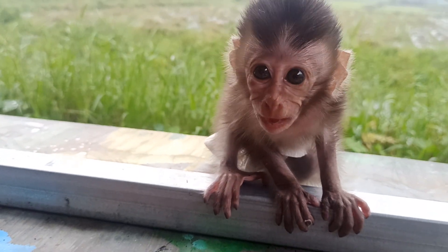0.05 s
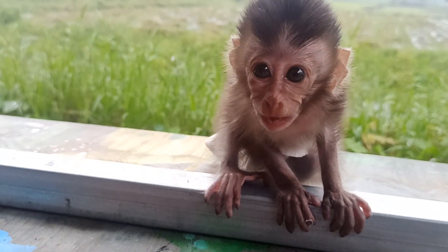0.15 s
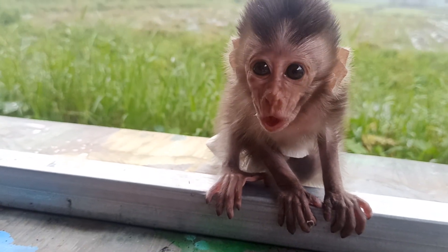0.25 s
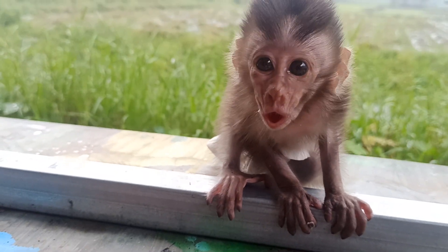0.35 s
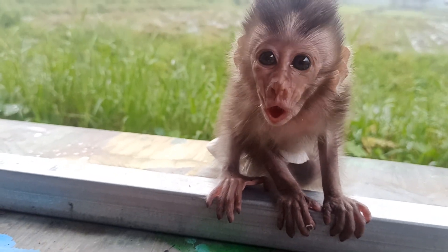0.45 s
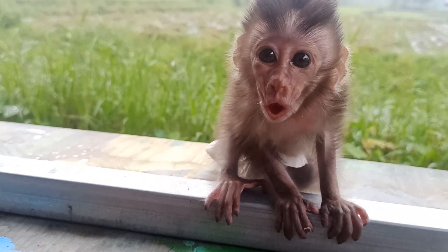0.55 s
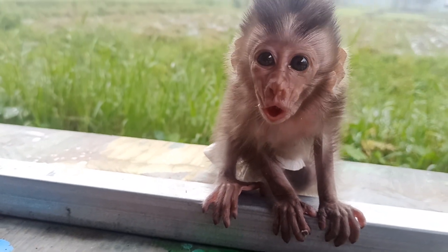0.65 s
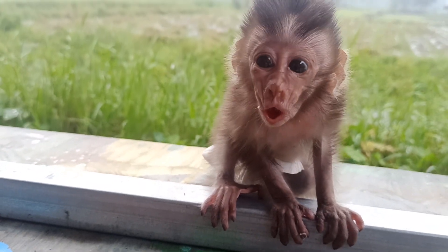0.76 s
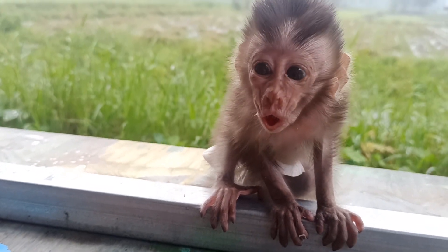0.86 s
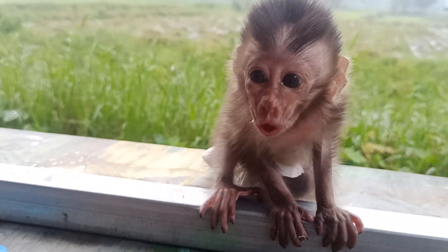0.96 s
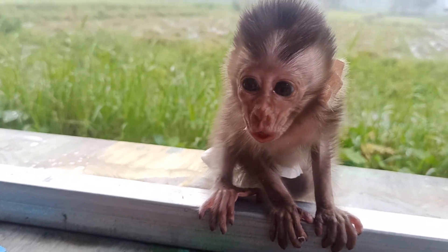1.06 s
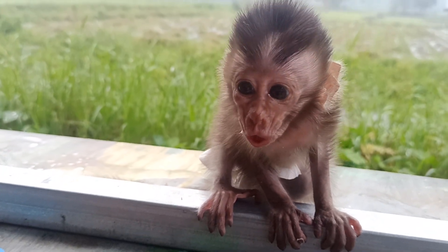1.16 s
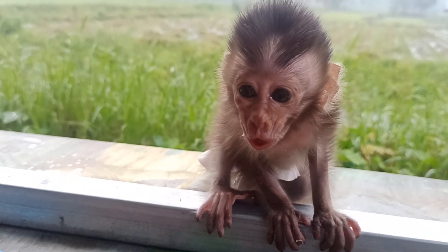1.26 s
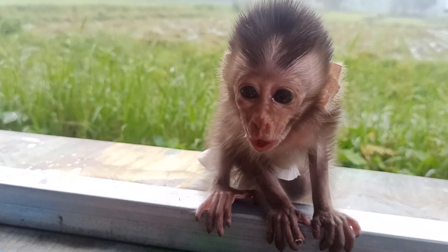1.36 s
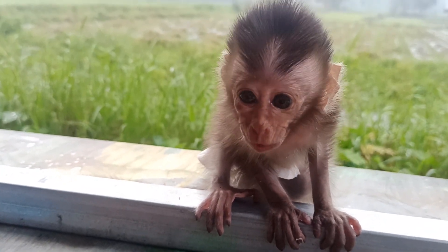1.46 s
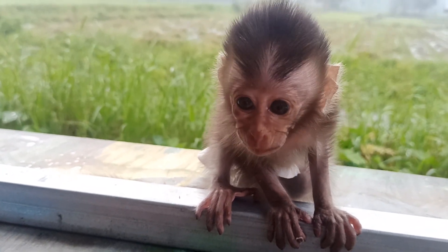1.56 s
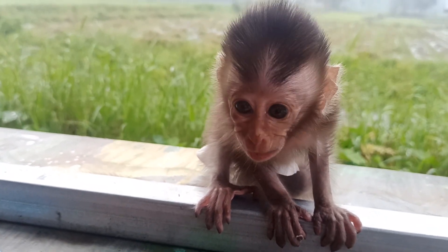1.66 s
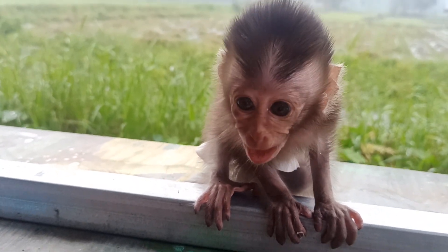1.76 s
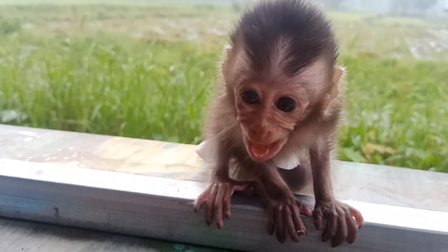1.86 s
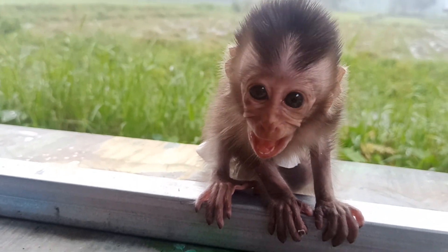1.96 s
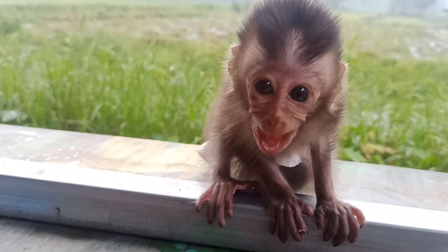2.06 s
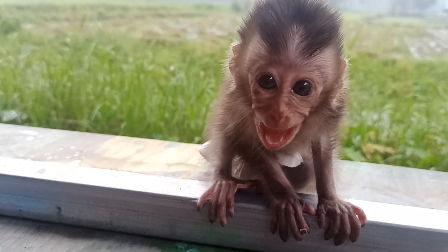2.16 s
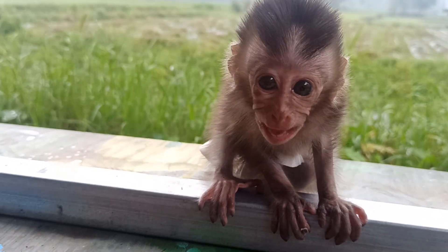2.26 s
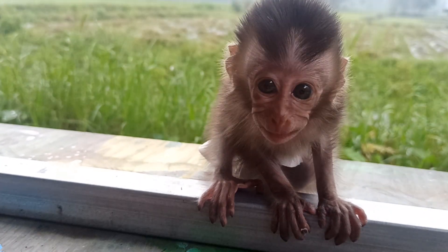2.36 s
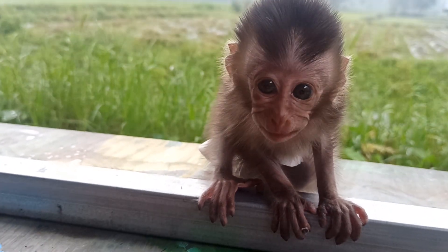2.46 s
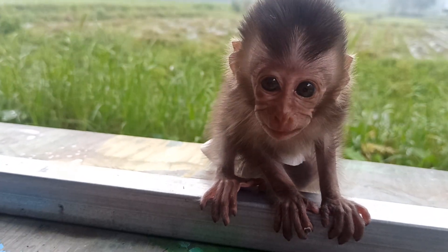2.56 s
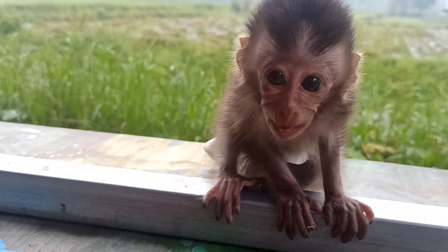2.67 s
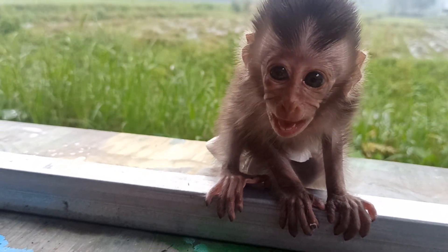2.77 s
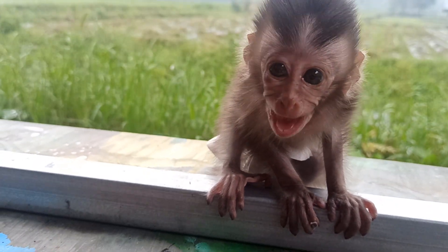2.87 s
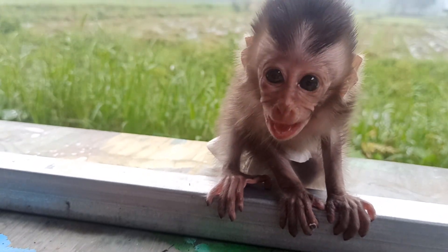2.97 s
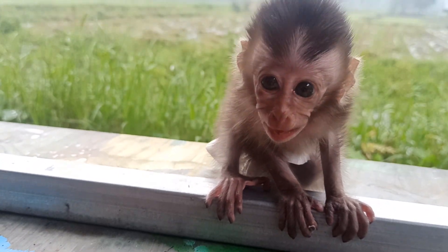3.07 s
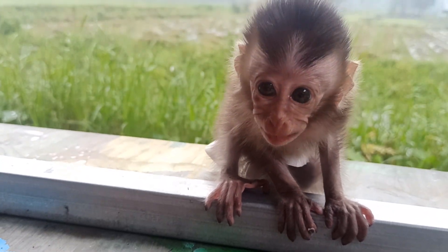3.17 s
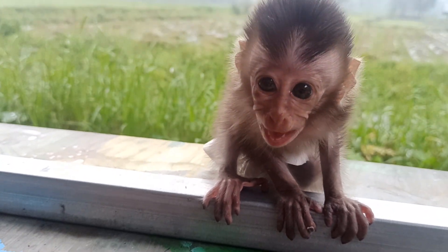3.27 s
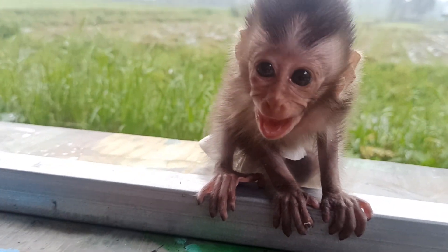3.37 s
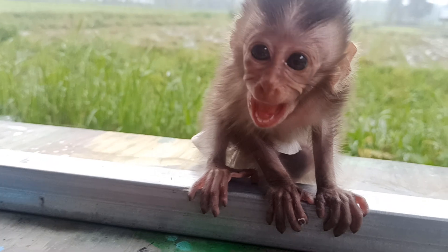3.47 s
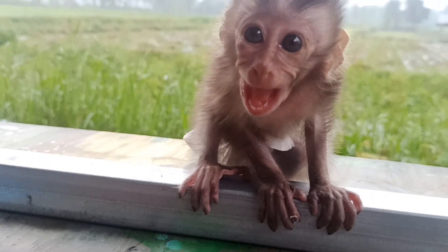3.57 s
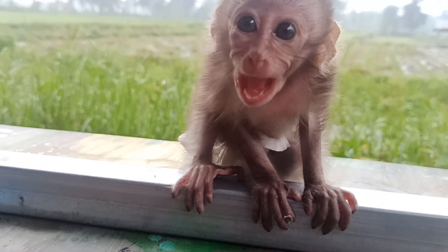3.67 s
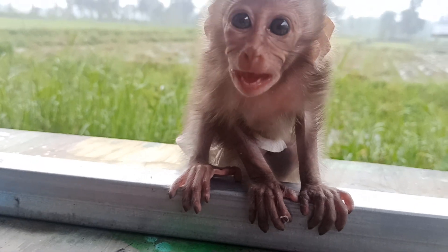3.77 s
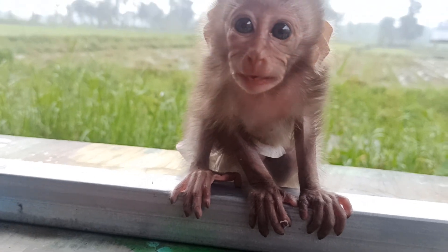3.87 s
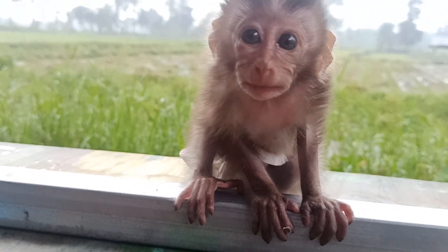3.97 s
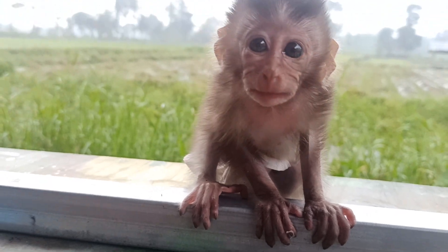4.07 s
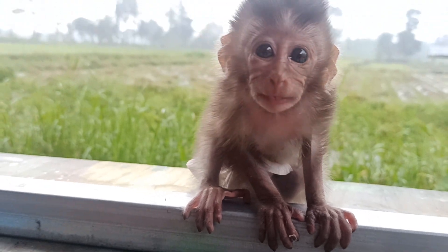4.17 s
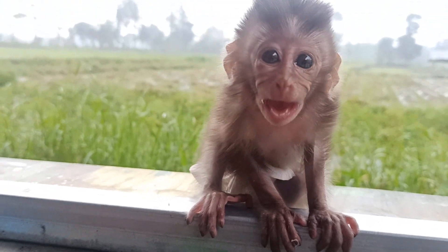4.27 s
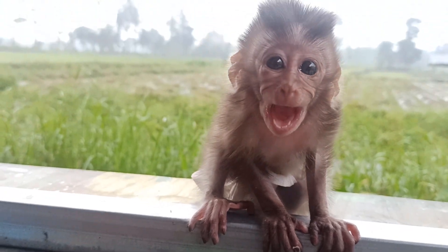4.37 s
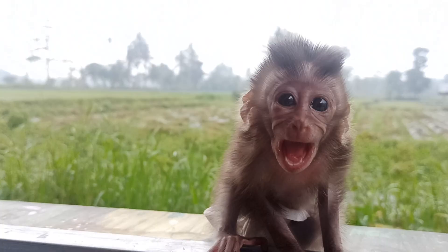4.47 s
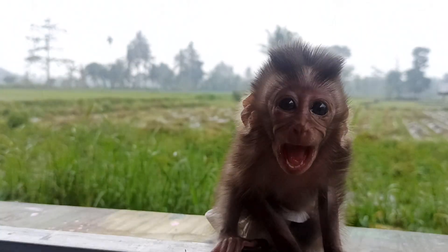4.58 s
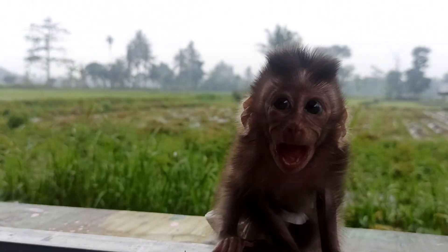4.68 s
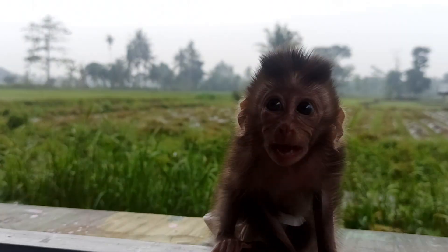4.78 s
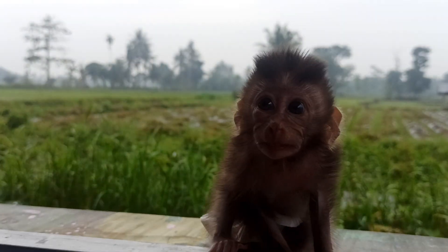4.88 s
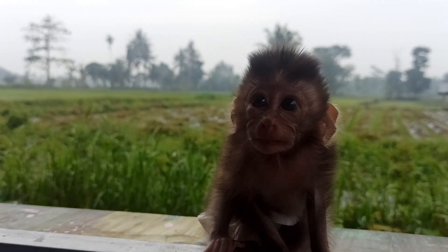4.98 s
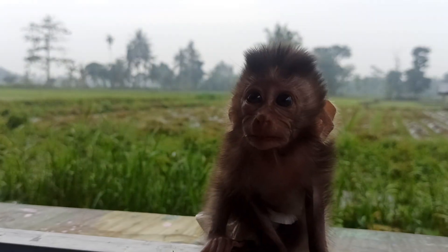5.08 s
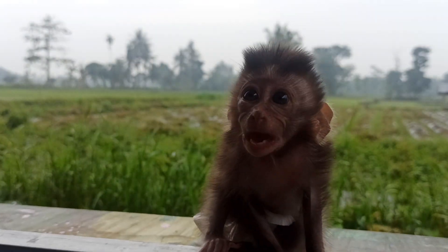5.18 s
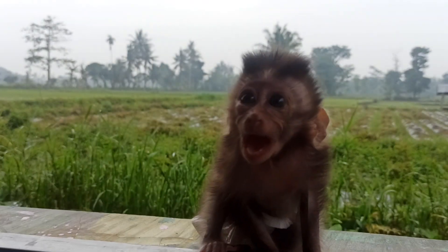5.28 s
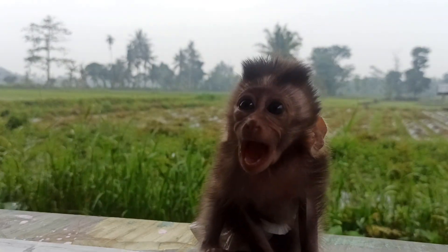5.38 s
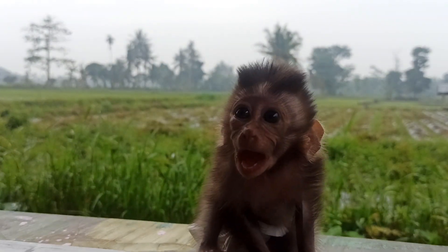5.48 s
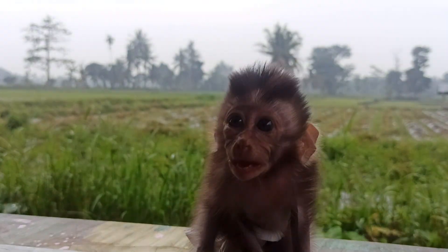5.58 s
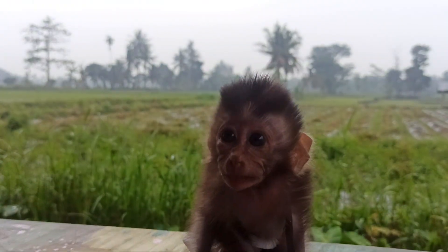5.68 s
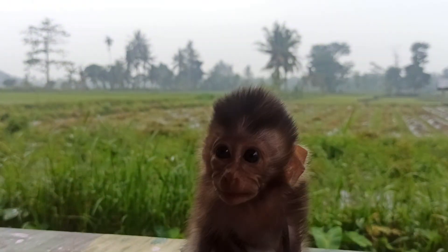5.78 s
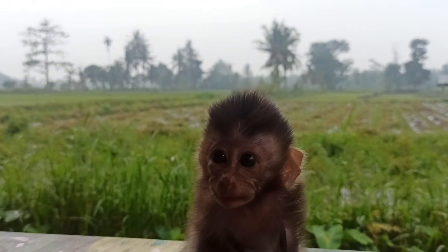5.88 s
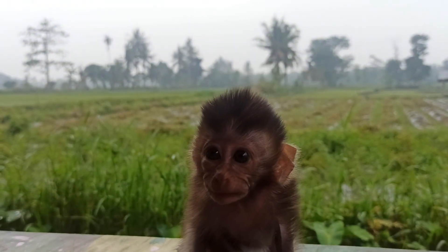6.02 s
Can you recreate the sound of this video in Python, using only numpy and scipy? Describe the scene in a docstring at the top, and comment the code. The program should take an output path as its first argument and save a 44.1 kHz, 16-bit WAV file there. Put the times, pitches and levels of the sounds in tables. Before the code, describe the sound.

Outdoors beside a grassy field, a baby monkey very close to a small stereo recorder coos softly twice, then breaks into thin shrill squeals that shoot upward, with tiny breathy gasps. Calls come in bursts with pauses. A short diffuse echo follows, stronger on squeals. Behind, low soft rumble, faint insect hiss and regular cricket chirps; fingers bump the recorder midway.

```python
"""A baby monkey coos, squeals and gasps close by: gliding overtones shaped by the lips, and puffs of coloured noise.
It sits on a low wall beside a wet field; two recorder ports hear it, and nearby walls answer with decaying noise echoes.
Insects drone (filtered noise), a cricket chirps (falling sines), far traffic swells (low noise),
a bird whistles once (a rising sine) and fingers tap the case (short pulses)."""
import sys
import numpy as np
from scipy import signal
from scipy.fft import rfft, irfft, next_fast_len
from scipy.io import wavfile
from scipy.ndimage import uniform_filter1d, minimum_filter1d, map_coordinates

SR = 44100
rng = np.random.default_rng(int(sys.argv[2]) if len(sys.argv) > 2 else 0)


def gain_from_decibels(decibels):
    """Convert decibel values to linear amplitude factors."""
    exponent = np.asarray(decibels, float) / 20
    return 10 ** exponent


def wav_out(sig):
    """Save sig, one row per channel (or a flat mono array), as 16-bit PCM at SR to the path in sys.argv[1]."""
    wavfile.write(sys.argv[1], SR, np.round(np.clip(np.atleast_2d(sig).T, -1, 1) * 32767).astype(np.int16))


N = 266805


def unit(x):
    """Scaled to rms 1."""
    return x / np.sqrt(np.mean(x ** 2) + 1e-20)


def along(points, hz, order=1):
    """One column of a (Hz, values) table, read on a log frequency axis."""
    table = np.transpose(points)
    return np.interp(np.log(hz + 1), np.log(table[0] + 1), table[order])


def wobble(rate, size=N):
    """A smooth random curve, rate knots a second."""
    knots = rng.standard_normal(int(size * rate / SR) + 4)
    return map_coordinates(knots, [np.arange(size) * rate / SR])


def filtered(x, response):
    """x times a complex response of frequency."""
    size = next_fast_len(x.shape[-1] + 8192)
    spectrum = rfft(x, size) * response(np.fft.rfftfreq(size, 1 / SR))
    return irfft(spectrum, size)[..., :x.shape[-1]]


# Left-right likeness of background noise. Each row: frequency in Hz, likeness from 0 to 1.
ALIKE = [(60, 0.93), (130, 0.97), (290, 0.68), (640, 0.24), (1400, 0.012)]
# Left-right balance of background noise. Each row: frequency in Hz, left minus right in dB.
LEAN = [(60, 1.5), (240, -1), (950, -0.5), (3770, -6.5), (15000, 20)]


def rush(spectrum, patchy_db):
    """Stereo noise of rms 1: likeness set by mixing mid and side, patches of random gain in time and frequency."""
    z = signal.stft(rng.standard_normal((2, N + 512)), nperseg=512)[2]
    patches = uniform_filter1d(uniform_filter1d(rng.standard_normal(z.shape[1:]), 6, 0), 14, 1)
    pair = signal.istft(z * gain_from_decibels(patchy_db * unit(patches)), nperseg=512)[1][:, :N]

    def mid_side(hz):
        angle = np.arccos(np.clip(along(ALIKE, hz), -1, 1)) / 2
        return gain_from_decibels(along(spectrum, hz)) * [np.cos(angle), np.sin(angle)]

    mid, side = filtered(pair, mid_side)
    both = np.array([mid + side, mid - side])
    return unit(filtered(both, lambda hz: gain_from_decibels(np.outer([.5, -.5], along(LEAN, hz)))))


# Rumble and grass. Each row: frequency in Hz, relative density in dB per Hz.
FIELD_SPECTRUM = [(18, -72.5), (30, -41.5), (60, -3.5), (160, 0), (226, -11), (281, -11.5), (552, -17.5),
                  (781, -15.5), (1400, -27.5), (1600, -27), (3280, -22.5), (4640, -16.5), (5400, -45.5),
                  (7020, -73.5), (11900, -120)]


def field():
    """Rumble and grass as noise whose level drifts slowly."""
    level_db = -49.5 + 0.84 * wobble(4.8)
    return gain_from_decibels(level_db) * rush(FIELD_SPECTRUM, patchy_db=0.5)


# Far insects. Each row: frequency in Hz, relative density in dB per Hz.
SWARM = [(3180, -59.5), (5400, -25), (6680, 5.5), (7070, -7), (8510, -6.5), (8780, -20.5), (9810, -71),
         (11100, -71), (11300, -30), (12100, -32.5), (15500, -31.5)]


def insects():
    """A far chorus of hiss, with one narrow buzzing drone that throbs about twelve times a second."""
    throb_phase = 2 * np.pi * 12 * np.arange(N) / SR + 2.8 * wobble(2.5)
    throb = gain_from_decibels(4.1 * np.sin(throb_phase) + 0.5 * wobble(1.1))
    drone = filtered(rng.standard_normal((2, N)), lambda hz: 1 / (1 + ((hz - 6560) / 90) ** 2))
    hiss = gain_from_decibels(-47.0) * rush(SWARM, patchy_db=4.5)
    return hiss + gain_from_decibels(-57.5) * throb * unit(drone) * gain_from_decibels([[1.5], [-1.5]])


# Air through the throat. Each row: frequency in Hz, relative density in dB per Hz.
BREATH = [(880, -71.5), (1500, -31.5), (2400, -31.5), (4120, -9.5), (5100, -30.5), (7720, -16.5),
          (10500, -83), (11800, -29.5), (15000, -31.5)]


def air():
    """Turbulent air coloured by the throat, rms 1."""
    return unit(filtered(rng.standard_normal(N), lambda hz: gain_from_decibels(along(BREATH, hz))))


# Puffs between calls and where the voice breaks. Each row: start in seconds, length in seconds, nominal level in dB.
GASPS = [(.002, 0.024, -37), (1.393, 0.0068, -49.5), (2.104, 0.028, -15.5), (2.135, .012, -24.5),
         (2.9, .02, -44.5), (3.67, .022, -33.5), (4.66, 0.034, -38.5), (5.205, 0.059, -28),
         (5.415, 0.023, -32.5)]


def gasps():
    """Short rushes of turbulent air: quick rise, slower fall, fluttering."""
    t, shape = np.arange(N) / SR, np.zeros(N)
    for start_s, length_s, db in GASPS:
        u = np.clip((t - start_s) / length_s, 0, None)
        shape += gain_from_decibels(db) * (1 - np.exp(-9 * u)) * np.exp(-u ** 3)
    return shape * gain_from_decibels(3.5 * wobble(220)) * air()


# Echo decay. Each row: frequency in Hz, time to fall 60 dB in seconds.
WALLS = [(500, 1), (2500, 0.43), (3300, 0.47), (4000, 0.66), (7500, 0.66), (13000, 0.63)]


def walls(x):
    """Diffuse echoes: a faint onset, a clump from a wall near 48 ms, then a tail dying band by band."""
    flutter_db, flutter_per_s = 3, 60
    hz, t, z = signal.stft(rng.standard_normal((2, SR * 3 // 4)), SR, nperseg=128)
    clump = .5 + 0.34 * np.exp(-((t - .045) / 0.0088) ** 2)
    decay = gain_from_decibels(-60 * t / along(WALLS, hz)[:, None])
    tail = signal.istft(z * clump * decay, SR, nperseg=128)[1]
    delayed = np.pad(tail, ((0, 0), (120, 0))) / np.linalg.norm(tail[0])
    echoes = signal.fftconvolve(x, delayed, axes=1)[:, :N]
    flutter = np.array([wobble(flutter_per_s), wobble(flutter_per_s)])
    return echoes * gain_from_decibels(flutter_db * flutter)


def cricket():
    """Regular phrases of four short falling chirps, the last one weak."""
    out, t = np.zeros(N + SR), np.arange(SR // 50) / SR
    chirp = np.sin(np.pi * t / t[-1]) ** 2 * np.sin(2 * np.pi * (5100 * t - 27000 * t ** 2))
    starts_s = .172 + .2422 * np.arange(25)
    for start_s, luck in zip(starts_s, rng.standard_normal((25, 4))):
        for k, db in enumerate([-50.5, -50.5, -50, -60]):
            out[round((start_s + .034 * k) * SR):][:len(t)] += gain_from_decibels(db + 1.5 * luck[k]) * chirp
    return out[:N] * gain_from_decibels([[-3], [3]])


# Pitch and effort, one list per call. Each row: time in seconds, pitch in Hz, effort in dB.
CRIES = [
    [(.254, 910, -42), (.265, 866, -28), (.308, 949, -27.5), (.358, 1010, -22.5), (.486, 1028, -22),
     (.51, 982, -23), (.535, 923, -29), (.543, 910, -47.5)],
    [(.705, 696, -32.5), (.723, 779, -29.5), (.748, 893.5, -24), (.791, 900, -22), (.808, 939.3, -21),
     (.864, 938.5, -20), (.884, 920, -23.5), (.897, 887, -51)],
    [(1.148, 668, -35), (1.16, 630, -30.5), (1.185, 615, -28.5), (1.206, 666, -32.5), (1.225, 804.5, -32.5),
     (1.256, 798, -31), (1.285, 748, -34), (1.316, 962, -24.5), (1.338, 999, -30), (1.365, 1291, -28),
     (1.383, 1220, -37)],
    [(1.648, 844, -35), (1.655, 780, -31.5), (1.667, 993, -25.5), (1.684, 930, -28.5), (1.692, 1060, -38.5),
     (1.698, 1092, -50)],
    [(1.742, 2284, -51), (1.749, 2410, -39), (1.753, 2647, -21.5), (1.785, 2723, -26.5),
     (1.796, 3192, -29.5), (1.821, 3805, -32), (1.832, 4563, -28), (1.846, 5501, -14), (1.858, 6815, -15.5),
     (1.868, 7560, -10), (1.877, 8540, -21), (1.9, 9160, -33.5), (1.915, 9270, -18), (1.95, 10290, -21.5),
     (1.978, 10650, -31), (2.012, 10530, -14), (2.03, 9670, -14), (2.055, 8785, -17.5), (2.066, 8420, -10),
     (2.078, 7844, -18.5), (2.094, 6420, -25.5), (2.107, 4245, -15.5), (2.113, 3450, -32),
     (2.125, 2692, -35), (2.141, 2300, -35.5), (2.15, 1900, -42), (2.168, 997, -43)],
    [(2.601, 697, -34.5), (2.609, 640, -29.5), (2.625, 612, -26.5), (2.638, 672, -35.5),
     (2.646, 760, -41.5)],
    [(2.703, 687, -33.5), (2.713, 595, -35), (2.726, 655, -29.5), (2.74, 1110, -34), (2.748, 1332, -25.5),
     (2.761, 1254, -26), (2.775, 1513, -38), (2.78, 1452, -63)],
    [(2.808, 2254, -44), (2.814, 2480, -20), (2.826, 2620, -17), (2.841, 2780, -26.5), (2.85, 2934, -39.5),
     (2.858, 3043, -45.5)],
    [(3.217, 911, -31), (3.224, 853, -37), (3.241, 831, -34.5), (3.254, 1144, -39), (3.268, 1400, -31),
     (3.279, 1681, -35.5), (3.296, 2282, -22), (3.326, 2650, -24), (3.34, 3160, -24), (3.358, 3296, -28),
     (3.369, 3440, -58)],
    [(3.402, 5270, -27.5), (3.411, 5570, -14.5), (3.418, 5926, -12.5), (3.428, 6960, -13.5),
     (3.443, 7650, -17.5), (3.465, 8700, -25.5), (3.485, 8810, -20.5), (3.515, 10270, -20)],
    [(4.179, 867, -33), (4.19, 742, -33.5), (4.206, 670, -32), (4.222, 805, -39.5), (4.24, 883, -34.5),
     (4.251, 770, -30), (4.26, 936, -26.5), (4.272, 1146, -26.5), (4.283, 1656, -24), (4.293, 1931, -17),
     (4.32, 2428, -19.5), (4.332, 3050, -29.5), (4.342, 3200, -18), (4.353, 3290, -25.5),
     (4.361, 3630, -34)],
    [(4.402, 5320, -16.5), (4.415, 5540, -23.5), (4.426, 6215, -15), (4.441, 6930, -22.5),
     (4.455, 7500, -20.5), (4.474, 7590, -22.5), (4.51, 7970, -29), (4.52, 8320, -16), (4.542, 8390, -20.5),
     (4.55, 7650, -37)],
    [(5.108, 793, -37), (5.114, 655, -34), (5.128, 697, -36), (5.143, 645.6, -26), (5.158, 638, -39.5),
     (5.172, 770, -37), (5.189, 625.6, -32), (5.204, 697, -31), (5.219, 1414, -25.5), (5.228, 1645, -25),
     (5.244, 1243, -25.5), (5.258, 1710, -25), (5.265, 2386, -23.5), (5.285, 2710, -19), (5.298, 3054, -34),
     (5.315, 3230, -39), (5.325, 3526, -27), (5.342, 3780, -51.5), (5.36, 3844, -46.5), (5.39, 3800, -61)],
    [(5.406, 2375, -36.5), (5.41, 2332, -24.5), (5.413, 2042, -30.5), (5.417, 1600, -27.5),
     (5.42, 1425, -37.5)],
]
# Posture, one row per call. Each row: overtone slope at start and at end in dB per octave,
# upper throat tilt in dB per kHz (pouted lips, 2.3 to 3.8 kHz), head turn as left minus right in dB.
POSTURE = [(-11.5, -11, 4, 1), (-11, -16.5, 4.5, -0.5), (-7.5, -11.5, 3, 1), (-13.5, -10.5, -4.5, 1.5),
           (-2, -4, -1, 0), (-13.5, -4.5, -3, 2.5), (-7, -10, 2, 5), (-5, -24, 0, 2.5),
           (-6.5, -6.5, -4.5, 0.5), (-7, -10.5, 0, -3), (-9.5, -6, -1.5, 5.5), (-3, -4, 0, 1.5),
           (-6, -7.5, -5, 2.5), (-8.5, -8, -9, -6)]
# Overtone slope by pitch: duller near 3.5 to 5 kHz, brighter above 6.7 kHz.
# Each row: pitch in Hz, added slope in dB per octave.
SLOPE_BY_PITCH = [(700, 1), (1200, 1.5), (2300, 0.5), (3500, -7), (5000, -7), (6700, 3.5), (8300, 3.5)]
# Throat and microphones. Each row: frequency in Hz, pouted lips in dB, wide mouth in dB, left minus right in dB.
MOUTH = [(600, -9, 4.5, -5.5), (1200, -8.5, -16.5, -5.5), (1658, 1, 0, -2.5), (2046, 10, -4.5, -9.5),
         (2526, -15, 4.5, -13.5), (2834, -4, 14, -4.5), (3343, 15.5, 19.5, -13.5), (4227, 22.5, 10, -16.5),
         (5670, -21, 1, -3), (6220, -4.5, 6, 20), (6900, 5, 11, -2.5), (7280, 16, 17.5, 4),
         (8750, 20.5, -10.5, 20.5), (10840, -24, 7, 6.5), (13280, -6, -5.5, -6), (15500, -4.5, -7.5, -8)]


def voice():
    """Vocal folds as ten overtones of the pitch, coloured by lips that part as it climbs; also the share sent to walls."""
    brighter_per_effort_db, usual_effort_db = 0.17, -31.5  # slope in dB per octave, per dB of effort
    brighter_in_glides_db = 2.5  # per octave, at full strain
    waver_wide_db, waver_in_glides_db, waver_per_s = 0.9, 1, 90
    tone, turn_db, leak, to_walls = np.zeros(N), np.zeros(N), np.zeros(N), np.ones(N)
    k = np.arange(1, 11)[:, None]
    for call, (first_db, last_db, upper_db, left_db) in zip(CRIES, POSTURE):
        s, *cols = np.transpose(call)
        span = np.arange(round(s[0] * SR), round(s[-1] * SR))
        size = len(span)
        pitch, effort_db = [np.interp(span / SR, s, c) for c in cols]
        pitch = uniform_filter1d(pitch, 160)
        # fast glides unsettle the folds
        strain = np.clip(abs(np.gradient(np.log(pitch))) * SR / 20, 0, 1)
        pitch = pitch * (1 + (0.0018 + 0.019 * strain) * wobble(250, size=size))

        slope_db = np.linspace(first_db, last_db, size) + along(SLOPE_BY_PITCH, pitch)
        slope_db += brighter_per_effort_db * (effort_db - usual_effort_db) + brighter_in_glides_db * strain
        wide = np.clip(np.log(pitch / 1100) / 0.17, 0, 1)
        pout_db = along(MOUTH, k * pitch) + upper_db * np.clip(k * pitch / 1000 - 2.3, 0, 1.5)
        colour_db = (1 - wide) * pout_db + wide * along(MOUTH, k * pitch, order=2)
        rolloff_db = (0.6273 + 0.067 * wide) * k ** 2
        level = gain_from_decibels(effort_db + slope_db * np.log2(k) - rolloff_db + colour_db) * (k * pitch < 16000)
        # each overtone above the first swells and sinks on its own
        waver = np.array([wobble(waver_per_s, size=size) for _ in k])
        level = level * gain_from_decibels((waver_wide_db * wide + waver_in_glides_db * strain) * waver * (k > 1))

        edge = np.minimum(span - span[0], span[-1] - span)
        fade = np.minimum(1, edge / (0.0033 * SR))
        shimmer = gain_from_decibels((0.25 + 0.63 * wide + 3 * strain) * wobble(158.3, size=size))
        overtones = level * np.sin(k * 2 * np.pi * np.cumsum(pitch) / SR)
        tone[span] = np.sqrt(2) * fade * shimmer * overtones.sum(0)
        leak[span] = fade * (.3 - 0.22 * wide + 0.3 * strain) * np.linalg.norm(level, axis=0)
        turn_db[span] = left_db
        to_walls[span] = gain_from_decibels(-6 * (2.0 - wide))  # pouted lips aim forward, so less reaches the walls
    cry = tone + gain_from_decibels(-15.5) * leak * air()  # air leaks past the folds, more when strained
    return cry * gain_from_decibels(np.outer([.5, -.5], turn_db)), to_walls


# Path difference to the two ports. Each row: frequency in Hz, left lead in radians.
LEAD = [(100, -0.5), (2000, 0.5), (3800, 2), (6300, 6.5), (9500, 10), (15500, 11.5)]


def ports(x):
    """The body of the recorder shades and delays the sound differently at each port."""
    half = np.array([[.5], [-.5]])

    def response(hz):
        shade = gain_from_decibels(half * along(MOUTH, hz, order=3))
        return shade * np.exp(1j * half * along(LEAD, hz))

    return filtered(x, response)


# Fingers on the case. Each row: time in seconds, peak in dB at the right port, knock frequency in Hz.
TAPS = [(2.06, -26.5, 304), (3.178, -22.5, 1330), (3.223, -11.5, 600), (3.25, -12, 1200), (3.252, -20, 350),
        (3.299, -25, 380), (3.827, -34.5, 399), (4.227, -26, 910), (4.26, -21, 370), (4.481, -28.5, 386),
        (4.498, -28.5, 684)]


def taps():
    """Each touch is one dull push through the case, felt almost only by the right port."""
    out, t = np.zeros(N), np.arange(-200, 200) / SR
    for centre_s, db, hz in TAPS:
        push = np.cos(2 * np.pi * hz * t) * np.exp(-(3.24 * hz * t) ** 2)
        out[round(centre_s * SR) - 200:][:len(t)] += gain_from_decibels(db) * push
    return out * gain_from_decibels([[-22], [0]])


def traffic():
    """A low rumble, then a hollow hum, each swelling as something passes far off."""
    t = np.arange(N) / SR
    # each row: frequency in Hz, relative density in dB per Hz
    low_spectrum = [(30, -30), (65, -4.5), (130, -20.5), (300, -78)]
    hum_spectrum = [(400, -53.5), (620, -9.0), (780, 3), (1000, -9.5), (1600, -42), (2500, -86.5)]
    low = gain_from_decibels(-60 - ((t - 5.1) / 0.1) ** 2) * rush(low_spectrum, patchy_db=3.0)
    hum = gain_from_decibels(-57.5 - ((t - 5.55) / .12) ** 2) * rush(hum_spectrum, patchy_db=2.5)
    return low + hum


def far_call():
    """One faint whistle of a distant bird, a sine rising from 850 to 1050 Hz."""
    u = np.clip((np.arange(N) / SR - 5.495) / 0.081, 0, 1)
    swell = np.sqrt(np.sin(np.pi * u).clip(0))
    return gain_from_decibels(-55.0) * swell * np.sin(2 * np.pi * np.cumsum(850 + 200 * u) / SR)


def scene():
    """The monkey near and echoed, over the sounds of the field."""
    cry, to_walls = voice()
    monkey = ports(cry + gasps())
    echoes = gain_from_decibels(-15.0) * walls(monkey * to_walls)
    background = field() + insects() + cricket() + traffic() + far_call()
    return monkey + echoes + taps() + background


def roll_off(x):
    """The treble ends steeply here."""
    return signal.sosfilt(signal.butter(12, 15680, fs=SR, output="sos"), x)


# Overall colour: weak lows, a gap at 9 to 11.5 kHz, highs returning above. Each row: frequency in Hz, gain in dB.
OVERALL_COLOUR = [(35, -22), (62, 2), (8700, 0), (9600, -14), (11200, -28), (11800, -2)]


def record(dry):
    """Overall colour with weak lows and a gap in the treble, then a look-ahead limiter near full scale."""
    heard = filtered(dry, lambda hz: gain_from_decibels(along(OVERALL_COLOUR, hz)))
    needed = np.minimum(1, .97 / (abs(heard).max(0) + 1e-9))
    gain = uniform_filter1d(minimum_filter1d(needed, size=301), size=151)
    return roll_off(heard * gain)


dry = scene()
out = record(dry)
wav_out(out)
```